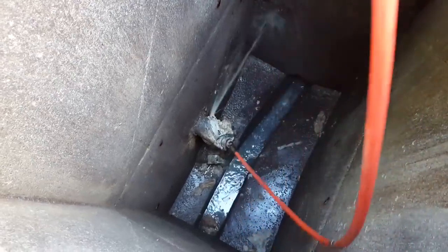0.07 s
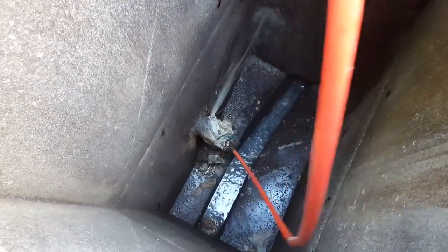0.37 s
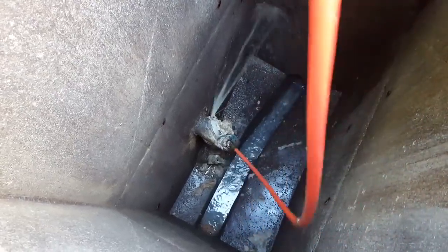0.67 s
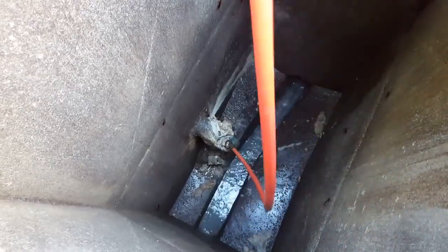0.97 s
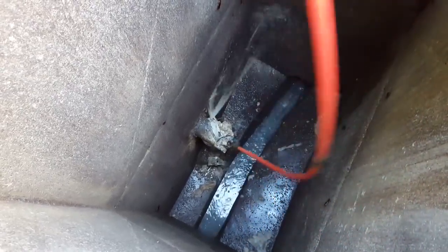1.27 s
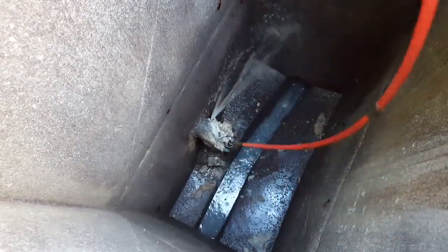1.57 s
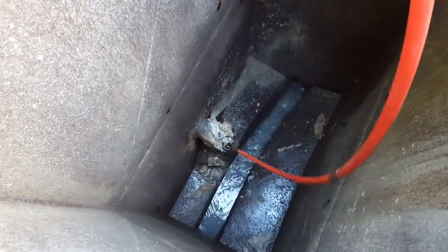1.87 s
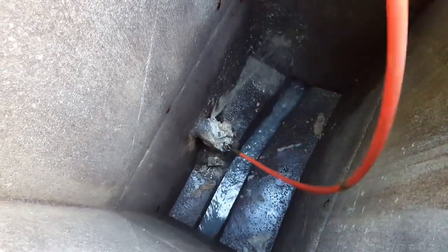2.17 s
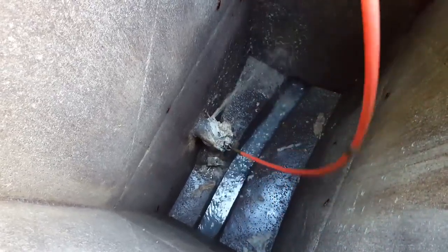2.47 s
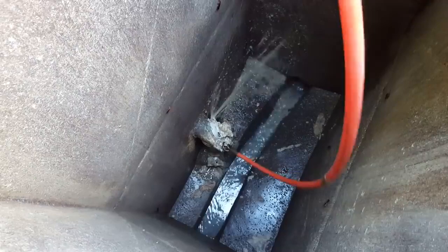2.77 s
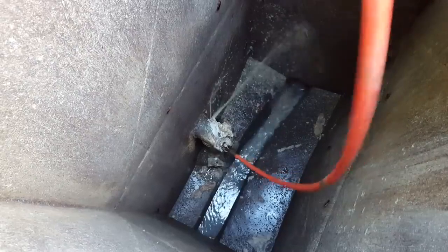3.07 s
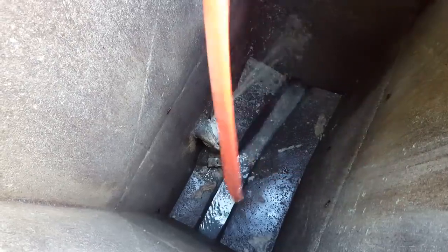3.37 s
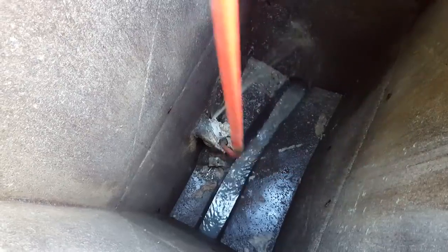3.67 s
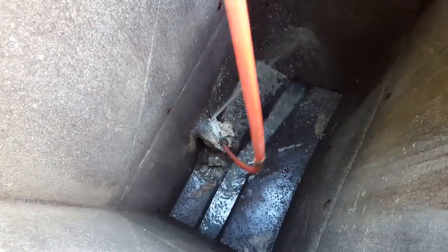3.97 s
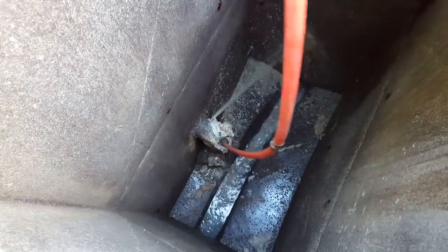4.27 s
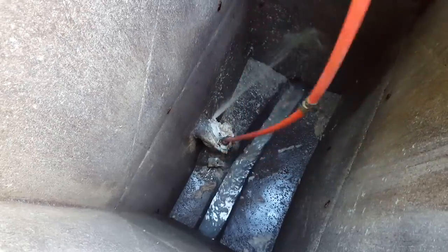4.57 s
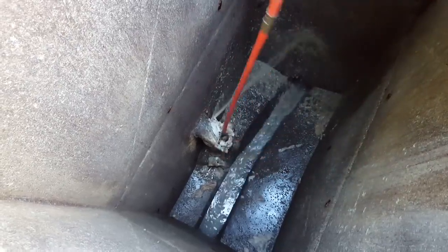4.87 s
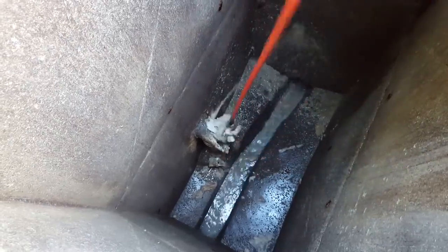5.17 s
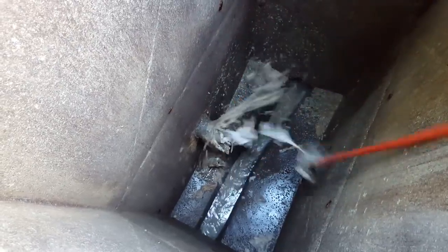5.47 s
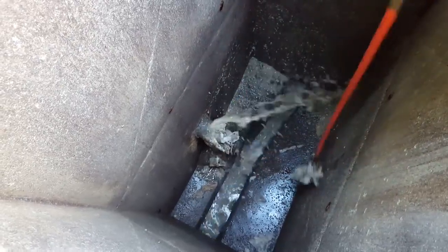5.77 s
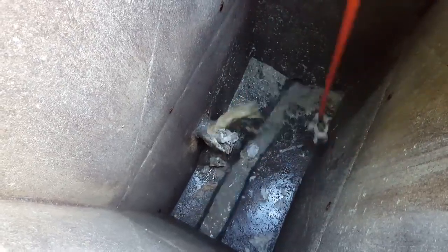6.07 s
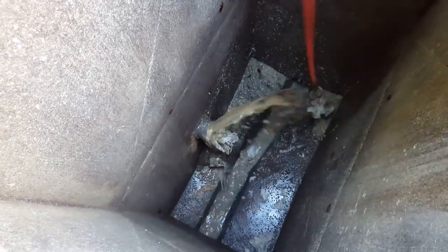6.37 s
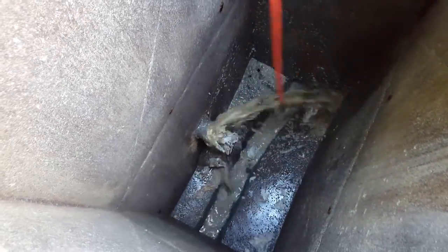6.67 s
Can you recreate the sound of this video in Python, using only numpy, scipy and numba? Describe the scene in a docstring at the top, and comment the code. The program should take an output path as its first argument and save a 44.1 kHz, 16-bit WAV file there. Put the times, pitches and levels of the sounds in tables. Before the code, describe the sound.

Water hisses and patters in a concrete drain shaft until a blockage pops free and the pipe gushes and bubbles.

```python
"""Hissing, pattering spray, as water jets past a rod in the blocked outlet of a deep concrete drain chamber.
Fine droplets tick on the floor, bigger drops slap and ring, and air pockets gurgle through the plug.
The plug pops out with a smack; after a short lull the pipe gushes, churning with bubbles and foam.
Heard from the rim, the shaft smears every drop with close echoes, rings at its cross modes
and booms with a low rumble."""
import sys
import numpy as np
from scipy import signal
from scipy.fft import rfft, irfft, next_fast_len
from scipy.io import wavfile
from scipy.ndimage import uniform_filter1d, map_coordinates
from numba import njit

SR = 44100
rng = np.random.default_rng(int(sys.argv[2]) if len(sys.argv) > 2 else 0)


def to_wav(s):
    """Save 16-bit WAV."""
    ch = np.atleast_2d(s).T  # columns
    pcm = np.round(np.clip(ch, -1, 1) * 32767)  # PCM
    wavfile.write(sys.argv[1], SR, pcm.astype(np.int16))


N = 295911
T = np.arange(N) / SR
TOP_HZ = 16000

# fader of the jet as the rod shifts; it stalls when the plug comes out, then gushes: t/s, level/dB
JET_FADER = [(0, -33), (.45, -30), (.7, -27), (1.27, -32), (1.7, -29.5), (2.36, -32.5), (2.46, -34.5),
             (2.91, -36), (2.96, -29), (3.9, -28), (4.3, -29), (5.37, -27), (5.49, -40), (5.61, -37),
             (5.83, -26.5), (6.18, -27), (6.42, -31), (6.71, -26)]
# how open the leak is, as big drops over fine spray: t/s, relative level/dB
PATTER_BALANCE = [(0, 1.5), (.65, -5), (2.2, -3), (2.75, 3.5), (3.05, 1.5), (3.3, -3), (3.85, 5),
                  (4.1, -4.5), (4.75, 1), (5.4, -2), (5.85, 3), (6.35, 6), (6.71, 3.5)]
# fader of the water churning in the channel: t/s, level/dB
STREAM_FADER = [(0, -46.5), (.75, -42.5), (1.4, -46.5), (2.2, -43.5), (2.75, -37.5), (3.6, -37.5),
                (4.15, -44), (4.65, -42.5), (5.25, -33.5), (5.56, -40.5), (5.78, -32.5), (5.87, -24.5),
                (6.04, -25.5), (6.13, -28.5), (6.33, -20.5), (6.71, -25)]
# spurts hitting the concrete: t/s, level/dB, centre f/Hz, length/s, pitch scatter (natural log)
SPURT_CUES = [(0.024, -23, 3870, 0.04, 0.12), (0.216, -22.5, 9350, 0.028, 0.11),
              (0.258, -23, 2850, 0.032, 0.16), (0.374, -21.5, 3800, 0.021, 0.17),
              (0.452, -26, 6450, 0.034, 0.1), (0.626, -36, 6500, 0.028, 0.26),
              (.708, -32, 4600, 0.014, 0.3), (.962, -25, 2800, .025, 0.082),
              (.995, -26.5, 3020, 0.021, .08), (1.14, -25, 4800, 0.022, 0.22),
              (1.225, -27, 9000, .02, 0.15), (1.451, -27, 5940, 0.034, .08),
              (1.647, -22.5, 4230, 0.056, 0.16), (1.751, -24.5, 2860, 0.016, 0.14),
              (1.946, -26, 4630, 0.013, 0.33), (2.004, -26.5, 3600, .04, 0.21),
              (2.263, -26, 7500, .025, 0.2), (2.338, -22, 8000, .033, 0.28),
              (2.701, -34, 3740, 0.033, 0.22), (2.814, -45, 4500, 0.015, .3),
              (3.006, -19, 3500, 0.07, 0.14), (3.135, -22, 2980, .012, .11),
              (3.397, -23.5, 4480, 0.027, .3), (3.455, -18, 5200, 0.022, .2),
              (3.852, -24.5, 3070, 0.063, 0.13), (4.037, -25, 3660, .012, .13),
              (4.175, -24, 4800, 0.045, 0.21), (4.335, -42, 3500, 0.013, .15),
              (4.504, -25.5, 2760, .02, 0.094), (4.568, -27, 8000, 0.032, 0.33),
              (4.702, -23, 2960, 0.015, 0.044), (4.74, -24, 2980, .014, .05),
              (4.77, -24.5, 2960, .018, 0.076), (4.827, -25.5, 2930, 0.016, 0.048),
              (5.066, -26, 4070, 0.017, 0.083), (5.2, -24, 3560, 0.014, 0.099),
              (5.625, -21, 3150, 0.034, 0.24), (5.767, -24.5, 3520, 0.027, 0.26),
              (5.837, -19.5, 2480, .014, 0.31), (6.028, -17, 2620, 0.039, .16),
              (6.156, -17, 7500, 0.027, 0.43), (6.333, -17.5, 3130, 0.028, 0.086),
              (6.552, -21, 4000, 0.037, 0.45), (6.614, -20, 2540, 0.016, .1),
              (6.69, -19, 1940, .028, 0.097)]
# air pockets breaking through the water: t/s, level/dB, f/Hz, ring/cycles, splashiness (0-1)
GLUG_CUES = [(.722, -39, 1200, 25, 0), (1.874, -36.5, 1205, 14, 0.1), (2.195, -35.5, 1350, 120, 0.4),
             (2.26, -38.5, 857, 33, 0.1), (2.372, -32, 737, 7, 0.6), (2.397, -30.5, 796, 11, 0.6),
             (2.624, -32, 1370, 12, 0.4), (2.643, -33, 1225, 37, 0.2), (3.305, -34.5, 742, 57, 0.1),
             (3.407, -30.5, 1100, 21, 0.3), (3.432, -29, 1265, 37, 0.2), (3.5, -33.5, 1210, 39, 0.5),
             (3.617, -33, 507, 1.3, 0.17), (3.64, -38, 1160, 19, .2), (3.796, -36, 1210, 25, .05),
             (4.699, -29, 1013, 65, 0.9), (4.729, -38, 860, 4.4, 0.9), (4.889, -37, 1390, 16, .1),
             (5.228, -31, 1060, 2.5, .9), (5.554, -33, 200, 8.5, 0.35), (5.703, -31, 920, 27, 0),
             (5.847, -21.5, 940, 4, 0.03), (5.904, -19.5, 1430, 14, 0.04), (6.016, -18, 1214, 30, 0.26),
             (6.147, -30.5, 576, 11, 0), (6.241, -22, 1180, 9, 0.1), (6.285, -20.5, 1150, 8.3, .7),
             (6.3735, -14.5, 391, 10, 0.1), (6.3911, -19, 425, 4.7, 0), (6.414, -27, 634, 22, 0.25),
             (6.438, -31, 448, 16, 0.6), (6.471, -28, 447, 13, 0.4), (6.537, -28, 935, 27, 0.3)]
# EQ curves of spray, patter, churning bubbles, bursting foam and rumble: f/Hz, level/dB
SPRAY_EQ = [(1000, -23.5), (1900, -58), (3000, -6.5), (4000, -2.5), (5000, -0.5), (6700, -4), (8000, -1.5),
            (9500, -4), (11700, -1.9), (13000, -5.5), (16000, -12.5)]
PATTER_EQ = [(1000, -23), (1950, -24.5), (2600, -2.5), (3300, 2), (4500, 1.5), (6000, -2), (10000, 0)]
BUBBLE_EQ = [(150, 3), (280, -8), (400, -6), (530, -7), (700, 0.5), (880, -2), (1250, 4), (1700, 0),
             (2600, 0.5), (4500, -7)]
FOAM_EQ = [(400, -26), (850, -29), (1220, 1.5), (1700, -8), (2400, 2), (4000, 4.5), (5500, -6), (8000, -11),
           (15000, -8)]
RUMBLE_EQ = [(20, -13), (37, -26), (48, -13), (60, 0), (78, -0.5), (103, -8), (120, 0.5), (145, -4),
             (170, -8.5), (230, -12.5), (400, -15.5), (900, -25)]
# cross modes between the walls: f/Hz, relative level/dB, t60/s
CROSS_MODES = [(364, -4, 0.95), (426, -3.5, 0.55), (487, -3.5, 0.33), (588, -5.5, 0.91), (672, -11, 1),
               (880, -5.5, 0.52), (933, 0.5, 0.2), (1070, -6, 0.31), (1147, -5, .28), (1269, -8, 0.48),
               (1367, -11, 0.6)]
# modes of the air column: f/Hz, relative level/dB
COLUMN_MODES = [(92, -42.5), (164.8, -45.5)]
# flat-topped swells of the boom: centre t/s, half length/s, boost/dB, mode f/Hz
BOOM_SWELLS = [(2.14, 0.25, 5.5, 92), (3.35, 0.48, 5.5, 164.8), (4.115, 0.35, 9, 164.8),
               (5.273, 0.43, 12, 92)]


def spray(rate=1500, spread_db=7.0, spit_db=11, tint_db=6.0, spots=6):
    """Fine droplets tick on the concrete at several spots, each with its own tint."""
    out = 0
    for spot in range(spots):
        tint = [(hz, db + tint_db * np.cos(2 * np.pi * (spot / spots + np.log2(hz) / 2)))
                for hz, db in SPRAY_EQ]
        out = out + eq(ticks(rate, spread_db, spit_db, direct_db=-6.5), tint)
    return unit_in_band(out, 5500, 15500)


def patter():
    """Larger drops slap the wet floor and ring for a few cycles."""
    slaps = shower(rate=900, lo_hz=1984, hi_hz=8560, cycles=11.7, spread_db=5.0, clump_db=0.5,
                   rise=0.15, direct_db=-6, spots=5)
    return unit_in_band(eq(slaps, PATTER_EQ), 2300, 5000)


def spurts(count=40, purity=1.74, trail=0.56, slap=1.3, slap_below_hz=4500):
    """A lead drop slaps down, harder in a coarse spurt, and more trail it; a tight pitch rings longer."""
    out = np.zeros((2, N))
    for s, db, hz, length, scatter in SPURT_CUES:
        late, size, pitch = rng.random(count), trail * rng.random(count), rng.standard_normal(count)
        cycles = np.full(count, purity / scatter)
        late[0], pitch[0], cycles[0] = 0, 0, cycles[0] / 2  # the lead drop
        size[0] = slap / (1 + (hz / slap_below_hz) ** 2)
        drop_hz = np.minimum(hz * np.exp(scatter * pitch), TOP_HZ)
        burst = rings(late * length, drop_hz, cycles, size * (1 - late / 2), 0.1, SR // 3)
        place(out, s, at_rim(burst, direct_db=-1.0), db)
    return out


def surges(depth_db=2.5, rise_s=0.012, fall_s=0.06, split_hz=4080, steepness=2.6):
    """Boosts in dB that ride each spurt: fine spurts swell the spray, coarse ones the patter."""
    out = np.zeros((2, N))
    for s, _, hz, length, _ in SPURT_CUES:
        fine = 1 / (1 + (split_hz / hz) ** steepness)
        swell = np.interp(T, [s - rise_s, s, s + length, s + length + fall_s], [0, 1, 1, 0])
        out = np.maximum(out, np.outer([fine, 1 - fine], swell))
    return depth_db * out


def glugs(count=12, scatter=0.377, trail_s=.035, rise=0.2):
    """A big bubble rings and rises in pitch as it nears the surface, shedding small ones."""
    out = np.zeros((2, N))
    for s, db, hz, cycles, splashy in GLUG_CUES:
        late, size, pitch = rng.random(count), splashy * rng.random(count), rng.standard_normal(count)
        late[0], size[0], pitch[0] = 0, 1, 0  # the big bubble
        bubble_hz = hz * np.exp(scatter * pitch)
        burst = rings(late * trail_s, bubble_hz, np.full(count, float(cycles)), size, rise, SR)
        burst = band(burst, hz / 1.48, 6 * hz)  # a bubble radiates little below its own pitch
        place(out, s, at_rim(burst, direct_db=-0.5), db)
    return out


def plug_pop(at_s=5.3575, smack_hz=2820., knock_hz=1000., slop_hz=1500, slop_s=0.053, count=90):
    """The plug lets go with a sharp smack and a hollow knock; a slop of water follows it."""
    out = np.zeros((2, N))
    smack = rings(np.zeros(2), np.array([smack_hz, knock_hz]), cycles=np.array([9., 2.]),
                  size=undb([0, -5]), rise=0., length=SR // 2)
    late, size, pitch = rng.random(count), rng.random(count), rng.standard_normal(count)
    slop = rings(late * slop_s, slop_hz * np.exp(.55 * pitch), cycles=np.full(count, 5.),
                 size=size, rise=0.1, length=SR // 2)
    place(out, at_s, at_rim(smack, direct_db=5), level_db=-21.5)
    place(out, at_s, at_rim(slop, direct_db=-4), level_db=-24.5)
    return out


def churn(foam_db=1):
    """The stream folds air into the channel: bubbles of all sizes under a bursting foam."""
    bubbles = shower(rate=1800, lo_hz=259, hi_hz=3350, cycles=6.4, spread_db=4.0, clump_db=3.0,
                     rise=0.29, direct_db=-3.0, spots=4)
    # treble tilt: small bubbles die sooner but are sharper
    bubbles = eq(signal.lfilter([1, -.96], 1, bubbles), BUBBLE_EQ)
    foam = sum(ticks(rate=3000, spread_db=2.5, spit_db=9.5, direct_db=-4) for _ in range(2))
    return unit_in_band(unit(bubbles) + undb(foam_db) * unit(eq(foam, FOAM_EQ)), 600, 1900)


def at_rim(x, direct_db, body_t60_s=0.28, treble_t60_s=0.13, modes_db=-46, modes_pan_db=4.0):
    """The shaft carries a sound up in stereo: direct path, dense wall echoes, ringing cross modes."""
    t = T[:int(.6 * SR)]
    noise = rng.standard_normal((2, len(t)))
    body = signal.sosfilt(signal.butter(1, 3000, fs=SR, output="sos"), noise)
    echoes = body * decay(t, body_t60_s) + (noise - body) * decay(t, treble_t60_s)
    mid, side = echoes / np.sqrt(SR * treble_t60_s / np.log(1e6))
    # long waves reach left and right alike
    side = undb(1) * signal.sosfilt(signal.butter(2, 600, "high", fs=SR, output="sos"), side)
    modes = sum(undb(db + modes_db) * np.sin(2 * np.pi * hz * t) * decay(t, t60)
                for hz, db, t60 in CROSS_MODES)
    response = np.array([mid + side, mid - side]) / np.sqrt(2)
    response += modes / 2 * undb([[modes_pan_db], [-modes_pan_db]])
    # the direct sound lands a few samples apart left and right
    response[[0, 1], rng.integers(0, 18, 2)] += undb(direct_db)
    return signal.fftconvolve(x[None], response, axes=1)[:, :len(x)]


def rumble(rumble_db=-36.5, boom_trim_db=-3, width_hz=3.58, side_db=-24, waver_db=1.9):
    """Low outdoor rumble fills the shaft and swells in two modes of its air column."""
    mid, side = undb(rumble_db + 0.5 * wander(3.9)) * unit(eq(rng.standard_normal((2, N)), RUMBLE_EQ))
    for hz, db in COLUMN_MODES:
        swell_db = sum(boost * np.exp(-((T - s) / half) ** 4)
                       for s, half, boost, mode_hz in BOOM_SWELLS if mode_hz == hz)
        phase = 2 * np.pi * np.cumsum(hz + width_hz / 3 * wander(12)) / SR
        mid = mid + undb(db + swell_db + boom_trim_db + waver_db * wander(14)) * unit(np.sin(phase))
    return mid + undb(side_db) * np.array([side, -side])


def ticks(rate, spread_db, spit_db, direct_db, spits_per_s=9, spit_s=0.012):
    """Tiny impacts on one spot, rate per second; now and then the water spits and dies back."""
    hits = (rng.random(N) < rate / SR) * rng.choice([-1, 1], N)
    onsets = (rng.random(N) < spits_per_s / SR) * rng.uniform(0.37, 1, N)
    spits = signal.lfilter([1], [1, -np.exp(-1 / (spit_s * SR))], onsets)
    size = undb(-spread_db * np.log(rng.random(N) + 0.015) + spit_db * np.tanh(spits))
    return at_rim(hits * size, direct_db)


def shower(rate, lo_hz, hi_hz, cycles, spread_db, clump_db, rise, direct_db, spots):
    """Ringing drops or bubbles, rate per second over several spots; like pitches swell in clumps."""
    clumps = np.array([wander(22) for _ in range(5)])
    out = 0
    for _ in range(spots):
        when, pitch, ring, size = rng.random((int(rate / spots * N / SR), 4)).T
        clump = map_coordinates(clumps, [pitch * (len(clumps) - 1), when * (N - 1)], order=1)
        gain = undb(-spread_db * np.log(size + 0.01) + clump_db * clump)
        hz = lo_hz * (hi_hz / lo_hz) ** pitch
        grains = rings(when * N / SR, hz, cycles * (.5 + ring), gain, rise, N)
        out = out + at_rim(grains, direct_db)
    return out


@njit
def rings(start_s, hz, cycles, size, rise, length):
    """One damped sine per drop, bubble or knock, gliding up by the fraction rise over its life."""
    out = np.zeros(length)
    for k in range(len(start_s)):
        first, life, phase = int(start_s[k] * SR), cycles[k] * SR / hz[k], 0.
        for i in range(min(int(life), length - first)):
            age = i / life
            phase += 2 * np.pi * hz[k] * (1 + rise * age) / SR
            out[first + i] += size[k] * np.sin(phase) * np.exp(-5 * age) * (1 - np.exp(-25 * age))
    return out


def place(out, s, sound, level_db):
    """Mix a stereo sound in at time s, with its loudest 30 ms at level_db."""
    i = int(s * SR)
    power = uniform_filter1d((sound ** 2).mean(axis=0), int(.03 * SR), mode="constant")
    out[:, i:i + sound.shape[1]] += (sound * undb(level_db) / np.sqrt(power.max()))[:, :N - i]


def eq(x, points):
    """Shape the tone with a curve of f/Hz, level/dB points."""
    hz, db = np.transpose(points)
    size = next_fast_len(N + 4096)
    f = np.fft.rfftfreq(size, 1 / SR) + 1
    gain = undb(np.interp(np.log(f), np.log(hz), db))
    return irfft(rfft(x, size) * gain, size)[..., :N]


def band(x, lo_hz, hi_hz, order=2):
    """Band-pass."""
    return signal.sosfilt(signal.butter(order, [lo_hz, hi_hz], "band", fs=SR, output="sos"), x)


def unit_in_band(x, lo_hz, hi_hz):
    """Scale a stereo layer so its mono mix has rms 1 in the band."""
    return x / band(x.mean(axis=0), lo_hz, hi_hz, order=4).std()


def unit(x):
    """Scale to rms 1."""
    return x / np.sqrt(np.mean(x ** 2))


def wander(rate):
    """Random drift of rms 1, gliding to a new value rate times a second."""
    hold = int(SR / rate)
    steps = np.repeat(rng.standard_normal(N // hold + 1), hold)
    return unit(uniform_filter1d(steps, hold)[:N])


def ride(fader):
    """A fader's level in dB at every sample."""
    return np.interp(T, *np.transpose(fader))


def decay(t, t60):
    """Exponential tail, 60 dB down at t60."""
    return 1000. ** (-t / t60)


def undb(db):
    """Decibels to gain."""
    return 10 ** (np.asarray(db) / 20)


def scene(spray_db=0.33, patter_db=-1.5, churn_db=-3.0, pan_db=0.82, patter_surge=0.97):
    """The jet drives spray and patter and lands a little to the right; the stream churns below it."""
    fine_swell, coarse_swell = surges()
    fine = undb(spray_db + fine_swell) * spray()
    coarse = undb(patter_db + ride(PATTER_BALANCE) + patter_surge * coarse_swell) * patter()
    jet = undb(ride(JET_FADER)) * (fine + coarse) + spurts()
    stream = undb(ride(STREAM_FADER) + churn_db) * churn()
    return jet * undb([[-pan_db], [pan_db]]) + stream + glugs() + plug_pop() + rumble()


def record(dry):
    """Clip at full scale, then cut the top steeply."""
    return signal.sosfilt(signal.ellip(10, .2, 80, TOP_HZ, fs=SR, output="sos"), np.clip(dry, -1, 1))


dry = scene()
out = record(dry)
to_wav(out)
```